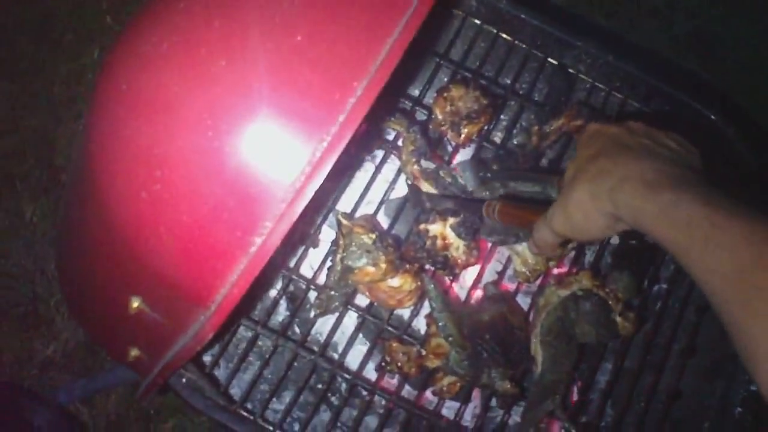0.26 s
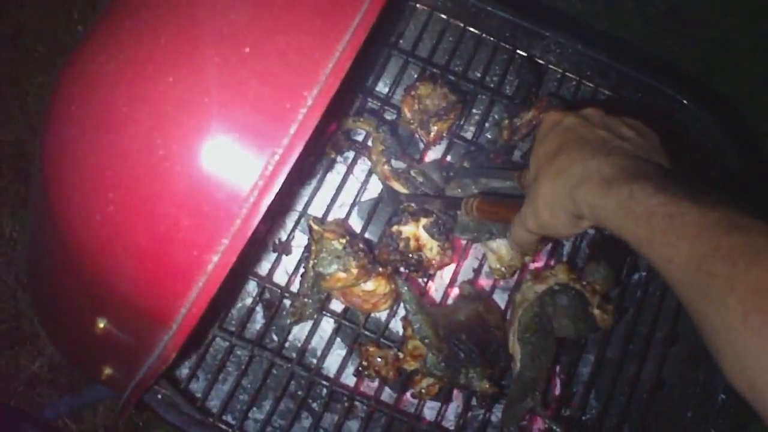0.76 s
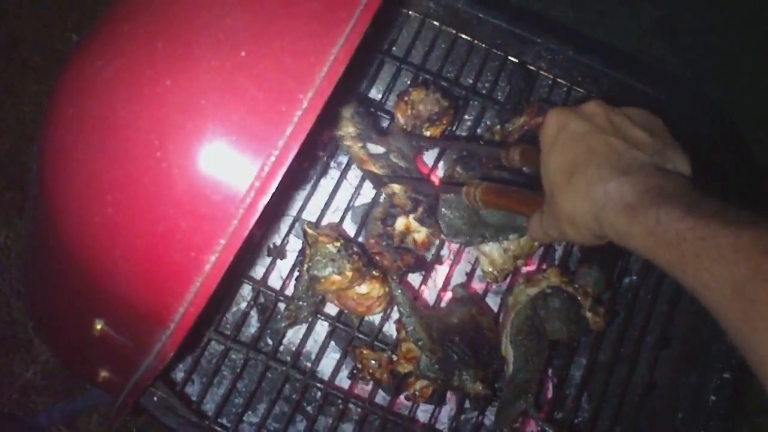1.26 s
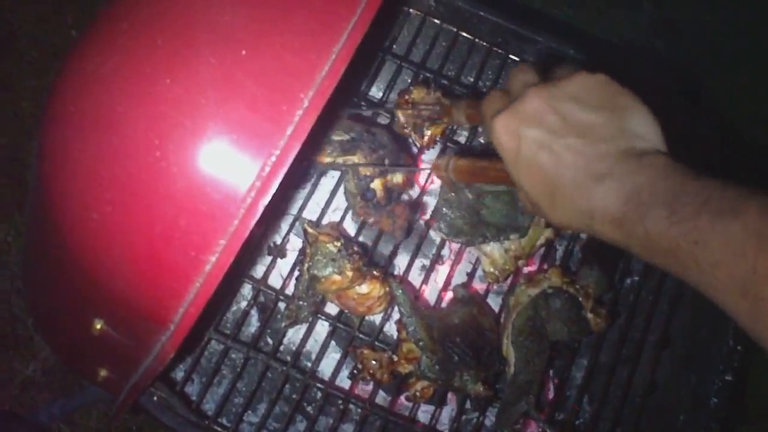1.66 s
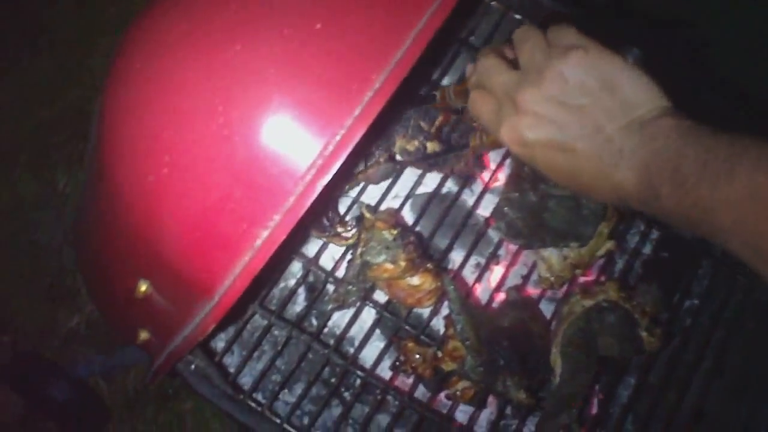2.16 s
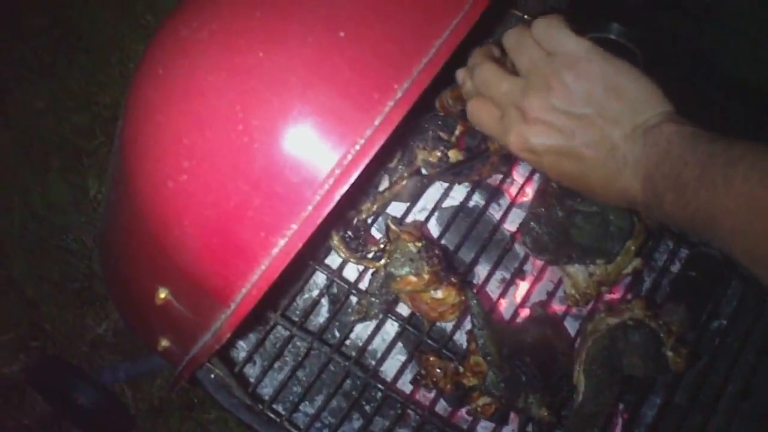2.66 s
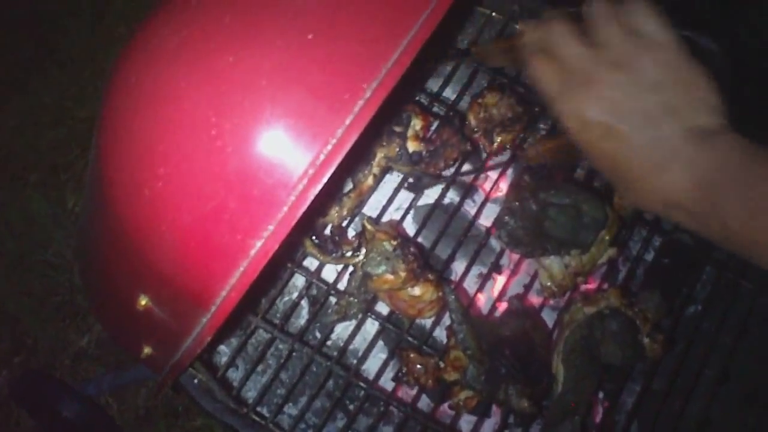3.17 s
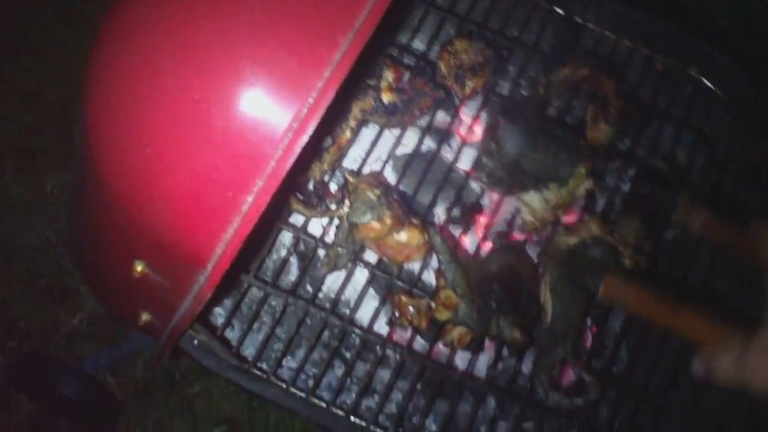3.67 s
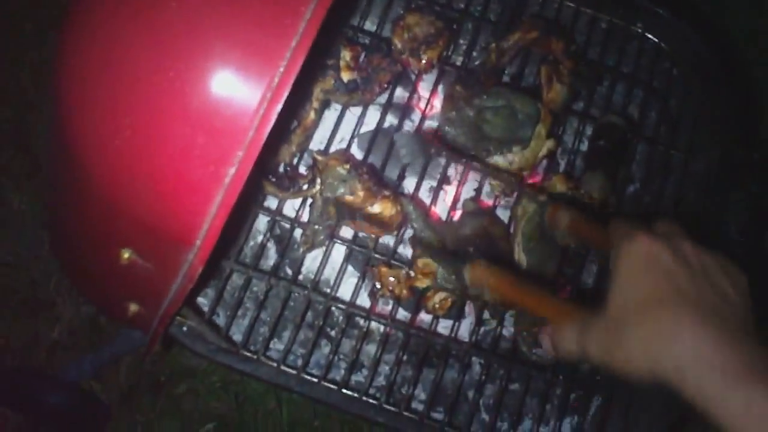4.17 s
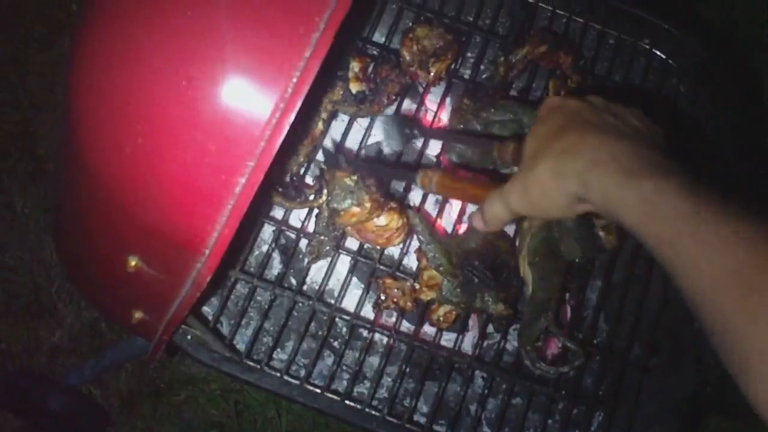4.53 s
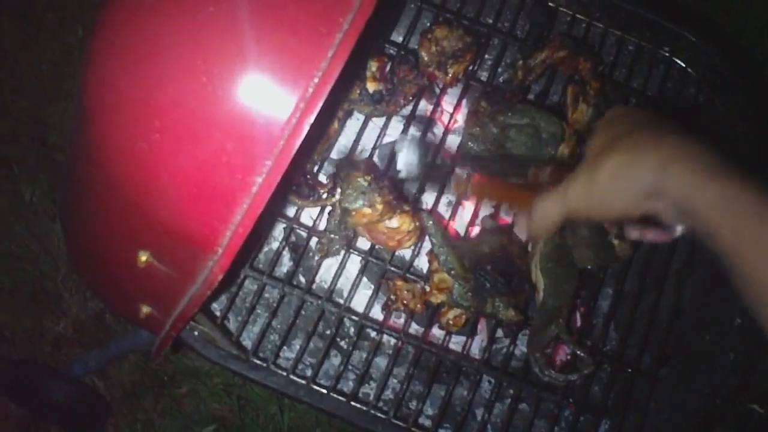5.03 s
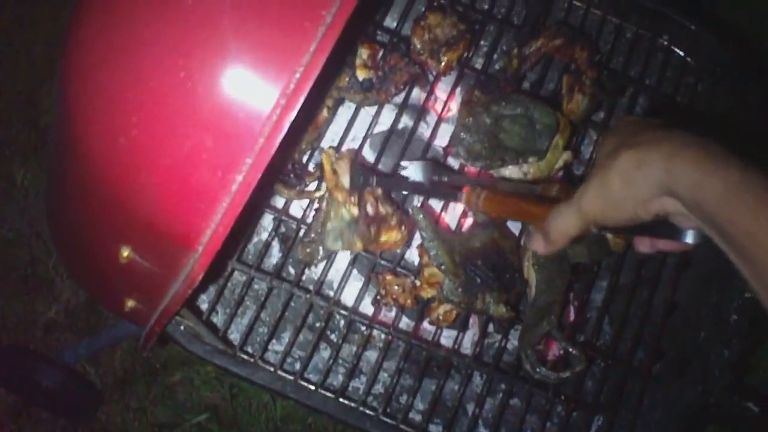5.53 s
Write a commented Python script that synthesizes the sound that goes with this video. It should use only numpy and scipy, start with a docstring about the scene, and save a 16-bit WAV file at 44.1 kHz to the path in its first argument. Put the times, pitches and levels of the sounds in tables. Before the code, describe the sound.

Fat hisses and spits over crackling coals outdoors, with a few light tong knocks, a steady fan hum and faint cricket chirps.

```python
"""Meat sizzles on a charcoal grill in a yard at night while it is turned with tongs.
Tiny steam bubbles burst in the fat, the coals crackle and the tongs knock briefly.
Spitting fat and tongs touching the grate make sharp pops and clicks.
Further off a fan motor hums and rushes, and a cricket chirps with its wings.
One narrow-band microphone hears it all."""
import sys
import numpy as np
from scipy import signal
from scipy.fft import rfft, irfft, next_fast_len
from scipy.io import wavfile

SR = 44100
rng = np.random.default_rng(int(sys.argv[2]) if len(sys.argv) > 2 else 0)


def unload_audio(sound):
    """Save the sound as a 16-bit wav file, at the path given as the first command line argument."""
    columns = np.transpose(np.atleast_2d(sound))
    # keep every value between -1 and 1, then stretch to whole-number steps
    steps = np.round(np.clip(columns, -1, 1) * 32767)
    wavfile.write(sys.argv[1], SR, steps.astype(np.int16))


N = 255780
TIME_S = np.arange(N) / SR

# air through the fan: freq_hz, density_db
FAN_AIR_SPECTRUM = [(25, -25.5), (60, -12), (130, -8.5), (280, -6), (450, -3.5), (680, 0.5), (1020, 2.5),
                    (1500, -1), (2100, -3), (2600, -8.5), (3100, -11), (3650, -13), (7000, -15.5),
                    (7700, -66)]
# steady motor tones: shaft_multiple, relative_db
MOTOR_HARMONICS = [(2, -19.5), (4, -16.5), (5, -21.5), (9, -20), (11, -14), (13, -19.5), (15, -11),
                   (18, -13), (19, -11), (20, -12), (21, -9), (24, -15.5), (27, -27), (28, -13.5),
                   (29, -13.5), (32, -11.5), (37, -16.5)]
# upper swelling fan tone: time_s, level_db
WHINE_LEVELS = [(0, -48), (.3, -55), (.45, -51), (2.1, -50), (3.2, -51.5), (3.6, -49.5), (3.92, -50.5),
                (4.05, -55.5), (4.52, -54.5), (4.62, -51.5), (4.95, -53.5), (5.35, -49.5), (5.8, -51)]
# lower swelling fan tone: time_s, level_db
DRONE_LEVELS = [(0, -59), (.45, -62), (.95, -56), (1.95, -59.5), (2.6, -57.5), (2.92, -54.5), (3.22, -58.5),
                (3.7, -56.5), (4.35, -55.5), (5.1, -54), (5.8, -58.5)]
# crackle of the coals: freq_hz, density_db
COAL_SPECTRUM = [(300, -23), (1000, -1.5), (1500, 1), (2200, 7), (3100, -6.5), (3800, -12), (5000, -22.5),
                 (8000, -57)]
# knocks of the tongs: start_s, strike_db
TONG_KNOCKS = [(1.6331, -28), (1.6912, -29), (2.8905, -21), (2.8980, -28), (2.8998, -27), (2.9028, -26),
               (2.9080, -30), (3.0326, -30)]
# resonances of the tongs: freq_hz, gain_db, t60_s
TONG_MODES = [(235, -27, 0.04), (370, -27, 0.035), (570, -22, 0.035), (680, -17, 0.03), (855, -11, 0.014),
              (1330, -9, 0.0093)]
# sharp pops and clicks from spitting fat and tongs touching the grate, levels as rms over 4 ms:
# start_s, crack_db, body_db, pitch_hz, width_octaves
GRILL_POPS = [(0.0568, -34, -36, 1900, .6), (0.1235, -39, -44, 3100, .8), (0.1966, -47, -43, 2700, 1),
              (0.5271, -39, -42, 2000, 1), (0.6015, -39, -47, 3000, 1), (0.6478, -41, -47, 2800, 1),
              (0.7039, -40, -45, 2900, .7), (0.8106, -38, -31, 2500, 1.15), (1.4332, -39, -44, 1400, .8),
              (1.4462, -40, -44, 3000, 1), (1.4991, -38, -39, 2500, 1.2), (1.5741, -35, -39, 3000, 1),
              (1.5985, -26.5, -31.5, 2800, .6), (1.6052, -38, -41, 2700, 1),
              (1.6204, -32, -33.5, 3100, .45), (1.6326, -33.5, -30.5, 2900, .65),
              (1.6906, -33.5, -35, 2400, .9), (1.7786, -43, -44, 2600, 1), (1.8548, -40, -47, 2600, 1),
              (1.9482, -40, -44, 2700, 1), (1.9663, -39, -42, 2500, .7), (2.1813, -40, -44, 2400, .7),
              (2.2414, -30.5, -41, 3300, .7), (2.2602, -36, -47, 3800, .7), (2.3060, -39, -44, 1900, .7),
              (2.3308, -32, -39, 3200, .9), (2.4967, -35, -38.5, 3000, .9), (2.5305, -38, -46, 2800, 1),
              (2.5395, -37, -44, 2800, .5), (2.5783, -44, -42, 2600, 1.2), (2.6189, -46, -45, 3600, .7),
              (2.9076, -33, -35, 2700, 1.3), (2.9995, -41.5, -43, 2900, .8),
              (3.0324, -37.5, -37.5, 2700, 1.5), (3.1024, -36, -41, 3300, .8), (3.1107, -41, -41, 2900, 1),
              (3.2407, -32, -34, 2800, .9), (3.4574, -33.5, -37.5, 1900, .8), (3.5188, -39, -47, 2600, 1),
              (3.7330, -39, -44, 1700, 1), (3.9804, -45, -44, 1800, .5), (4.0345, -42, -42, 1800, .7),
              (4.0451, -47, -45, 1900, .6), (4.4475, -42, -40.5, 1900, .7), (4.6365, -42, -42.5, 2400, .9),
              (4.7049, -50, -43, 1400, .8), (4.7391, -47, -45, 2600, .9), (4.8530, -40, -50, 3000, .8),
              (4.8982, -38, -47, 3100, .6), (4.9159, -38, -50, 3000, .6), (4.9359, -33, -42, 2700, 1),
              (4.9697, -31, -37, 4400, .5), (4.9928, -41, -46, 2900, .8), (5.2805, -47, -43, 1500, .8),
              (5.5102, -39.5, -47, 2800, 1), (5.5682, -40, -47, 2800, 1), (5.7700, -45, -46, 2000, 1)]
# crack of a pop: freq_hz, density_db
CRACK_SPECTRUM = [(1000, -26.5), (3700, -18), (4400, -5), (5000, -4), (5500, 6), (6200, 5.5), (6650, 8),
                  (7200, -1), (7700, -19), (8300, -42)]
# body of a pop, around its pitch: offset_widths, density_db
BODY_SHAPE = [(-5, -30), (-2.4, -13), (-1.2, -4.5), (-.4, -1.5), (0, 1), (.3, -1.5), (.6, -8), (1.1, -15),
              (2, -40)]
# thud under a pop: freq_hz, density_db
THUD_SPECTRUM = [(60, -26), (200, -10), (500, 0), (900, 0), (1400, -9), (2500, -25), (5000, -50)]
# frying fat: freq_hz, density_db
FAT_SPECTRUM = [(300, -20.5), (1000, -14), (2100, -2), (2650, -6), (3150, -0.5), (3620, -10), (4400, -4.5),
                (5050, -4.5), (5400, 2.5), (5750, 5), (6300, 1.5), (6700, 3.5), (7200, -3), (7700, -58.5)]
# slow course of the frying, easing while the meat is left alone: time_s, level_db
FRYING_LEVELS = [(0.0, -44), (1.05, -45), (1.44, -42), (1.82, -45), (2.35, -43), (2.9, -47), (3.45, -44.5),
                 (3.8, -47.5), (4.6, -48.5), (5.05, -49), (5.5, -44.5), (5.8, -47)]
# juice runs onto hot metal: peak_s, rise_db
JUICE_FLARES = [(0.2, 4.5), (0.725, 3.5), (1.149, 2.5), (1.429, 2), (1.59, 2.5), (3.09, 6.5), (5.02, 0.5),
                (5.24, 3)]


def from_db(db):
    """Decibels to gain."""
    return 10 ** (np.asarray(db) / 20)


def unit_rms(x):
    """Scale to rms 1."""
    return x / np.sqrt(np.mean(x ** 2) + 1e-20)


def curve(rows):
    """Breakpoints interpolated to every sample."""
    return np.interp(TIME_S, *np.transpose(rows))


def drift(rate_hz):
    """Slow random wander, rms 1."""
    hop, settle = 40, 2000
    pole = np.exp(-2 * np.pi * rate_hz * hop / SR)
    noise = rng.standard_normal(N // hop + settle + 2)
    slow = signal.lfilter([1], [1, -2 * pole, pole * pole], noise)[settle:]
    return np.interp(np.arange(N) / hop, np.arange(len(slow)), unit_rms(slow))


def coloured(x, spectrum):
    """Minimum-phase filter following rows of freq_hz, gain_db."""
    length = x.shape[-1]
    size = next_fast_len(length + SR // 10)
    freq_hz, gain_db = np.transpose(spectrum)
    grid_hz = np.maximum(np.arange(size // 2 + 1) * SR / size, 1)
    gain = from_db(np.interp(np.log(grid_hz), np.log(freq_hz), gain_db))
    cepstrum = irfft(np.log(gain), size)
    cepstrum[1:size // 2] *= 2
    cepstrum[size // 2 + 1:] = 0
    return irfft(rfft(x, size) * np.exp(rfft(cepstrum)), size)[..., :length]


def ring(clicks, freq_hz, t60_s):
    """Damped resonance: a unit click starts a sine of height 1."""
    radius = from_db(-60 / (t60_s * SR))
    step_rad = 2 * np.pi * freq_hz / SR
    feedback = [1, -2 * radius * np.cos(step_rad), radius * radius]
    return signal.lfilter([0, np.sin(step_rad)], feedback, clicks + 1e-18)


def random_clicks(rate_per_s, spread_db, cap_spreads):
    """Randomly timed clicks; levels in dB follow a capped exponential distribution."""
    heights = from_db(spread_db * np.minimum(rng.exponential(1, N), cap_spreads))
    return heights * (rng.random(N) < rate_per_s / SR)


def puffs(clicks, t60_s, bowl_db, bowl_t60_s):
    """Each click releases a puff of steam that scatters briefly in the grill bowl."""
    energy = clicks ** 2 + 1e-18
    direct = signal.lfilter([1], [1, -from_db(-120 / (t60_s * SR))], energy)
    scatter = signal.lfilter([1], [1, -from_db(-120 / (bowl_t60_s * SR))], energy)
    return np.sqrt(direct + from_db(bowl_db) ** 2 * scatter) * rng.standard_normal(N)


def fan(shaft_hz, wander_hz, hum_db, waver_db, rush_db):
    """Shaft harmonics, each wavering on its way across the yard, over a steady rush of air."""
    turns = np.cumsum(shaft_hz + wander_hz * drift(rate_hz=1.69)) / SR
    tones = [(multiple, hum_db + relative_db) for multiple, relative_db in MOTOR_HARMONICS]
    tones += [(16, curve(WHINE_LEVELS)), (14, curve(DRONE_LEVELS))]
    hum = np.zeros(N)
    for multiple, level_db in tones:
        amplitude = np.sqrt(2) * from_db(level_db + waver_db * drift(rate_hz=4.4))
        hum += amplitude * np.sin(2 * np.pi * (multiple * turns + rng.random()))
    rush = unit_rms(coloured(rng.standard_normal(N), FAN_AIR_SPECTRUM))
    return hum + from_db(rush_db) * rush


def cricket(pitch_hz, wander_hz, first_s, period_s, length_s, strokes_per_s):
    """Evenly paced, slowly fading chirps: a few wing strokes each on one nearly pure note."""
    start_db, fade_db_per_s, spread_db = -49, 0.65, 0.5
    envelope = np.zeros(N)
    for centre_s in np.arange(first_s, TIME_S[-1], period_s):
        level_db = start_db - fade_db_per_s * centre_s - spread_db * rng.standard_normal()
        swell = np.exp(-np.abs(2 * (TIME_S - centre_s) / length_s) ** 4)
        strokes = np.abs(np.cos(np.pi * (strokes_per_s * TIME_S + rng.random())))
        envelope += 2 * from_db(level_db) * swell * strokes
    cycles = np.cumsum(pitch_hz + wander_hz * drift(rate_hz=30)) / SR
    return envelope * np.sin(2 * np.pi * cycles)


def coals(level_db):
    """Low, even crackle, independent of the frying."""
    clicks = random_clicks(rate_per_s=60, spread_db=3.5, cap_spreads=2.5)
    crackle = puffs(clicks, t60_s=0.014, bowl_db=-22.5, bowl_t60_s=0.019)
    return from_db(level_db) * unit_rms(coloured(crackle, COAL_SPECTRUM))


def tongs(low_cut_hz):
    """Soft, quickly damped knocks; thin steel radiates no bass."""
    start_s, strike_db = np.transpose(TONG_KNOCKS)
    strikes = np.zeros(N)
    strikes[np.round(start_s * SR).astype(int)] = from_db(strike_db)
    high_pass = signal.butter(2, low_cut_hz, "high", fs=SR, output="sos")
    strikes = signal.sosfilt(high_pass, strikes + 1e-18)
    return sum(from_db(gain_db) * ring(strikes, hz, t60_s) for hz, gain_db, t60_s in TONG_MODES)


def pop(spectrum, bowl_db, bowl_t60_s):
    """A snap, a puff of noise and a faint tail from the bowl; energy equals 4 ms at rms 1."""
    snap_share, attack_s, puff_t60_s = 0.35, 0.0004, 0.006
    age_s = TIME_S[:SR // 20]
    attack = 1 - np.exp(-age_s / attack_s)
    decay = from_db(-60 * age_s / puff_t60_s) + from_db(bowl_db - 60 * age_s / bowl_t60_s)
    puff = rng.standard_normal(len(age_s)) * decay * attack
    puff *= np.sqrt((1 - snap_share) / np.sum(puff ** 2))
    snap = np.sqrt(snap_share) * signal.unit_impulse(len(age_s))
    burst = coloured(snap + puff, spectrum)
    return burst / np.sqrt(np.sum(burst ** 2) / (0.004 * SR))


def grill_pops(body_top_hz, body_lag_s, thud_relative_db):
    """Fat spits or tongs touch the grate: a bright crack, then a lower body and a dull thud."""
    track = np.zeros(N + SR)
    low_pass = signal.butter(8, body_top_hz, fs=SR, output="sos")
    for start_s, crack_db, body_db, pitch_hz, width_octaves in GRILL_POPS:
        crack = from_db(crack_db) * pop(CRACK_SPECTRUM, bowl_db=-25, bowl_t60_s=0.08)
        body_spectrum = [(pitch_hz * 2 ** (offset * width_octaves), db) for offset, db in BODY_SHAPE]
        body = from_db(body_db) * pop(body_spectrum, bowl_db=-24, bowl_t60_s=0.085)
        body = signal.sosfilt(low_pass, body)
        thud = from_db(body_db + thud_relative_db) * pop(THUD_SPECTRUM, bowl_db=-26, bowl_t60_s=0.03)
        for onset_s, sound in ((start_s, crack), (start_s + body_lag_s, body + thud)):
            onset = int(onset_s * SR)
            track[onset:onset + len(sound)] += sound
    return track[:N]


def frying_db(attack_s, release_s):
    """Sizzle level: a slow course plus brief flares as juice meets hot metal."""
    level_db = curve(FRYING_LEVELS)
    for peak_s, rise_db in JUICE_FLARES:
        width_s = np.where(TIME_S < peak_s, attack_s, release_s)
        level_db += rise_db * np.exp(-((TIME_S - peak_s) / width_s) ** 2)
    return level_db


def sizzle(haze_db, crackle_db):
    """A haze of tiny bubbles plus sparser crackle; harder frying bursts louder and more often."""
    level = from_db(frying_db(attack_s=0.026, release_s=0.072))
    vigour = unit_rms(level)
    bubbles = random_clicks(rate_per_s=5000 * vigour, spread_db=-3.5, cap_spreads=3.6)
    haze = puffs(bubbles, t60_s=0.012, bowl_db=-12, bowl_t60_s=0.072)
    clustering = from_db(2 * drift(rate_hz=13))
    ticks = random_clicks(rate_per_s=260 * vigour * clustering, spread_db=4, cap_spreads=2.6)
    crackle = puffs(ticks, t60_s=0.0098, bowl_db=-18.5, bowl_t60_s=0.045)
    fat = from_db(haze_db) * unit_rms(coloured(haze, FAT_SPECTRUM))
    fat += from_db(crackle_db) * unit_rms(coloured(crackle, FAT_SPECTRUM))
    return fat * level / np.sqrt(vigour)  # the burst rate already contributes sqrt(vigour)


def scene():
    """Grill and yard at one microphone, alike in both channels."""
    grill = sizzle(haze_db=-0.5, crackle_db=-5.5)
    grill += grill_pops(body_top_hz=6500, body_lag_s=0.0002, thud_relative_db=-18)
    grill += coals(level_db=-61.5)
    grill += tongs(low_cut_hz=362)
    yard = fan(shaft_hz=59.1, wander_hz=0.025, hum_db=-51.5, waver_db=0.7, rush_db=-45.5)
    yard += cricket(pitch_hz=6757, wander_hz=24, first_s=0.095, period_s=0.387,
                    length_s=0.13, strokes_per_s=27)
    return np.tile(grill + yard, (2, 1))


def record(dry):
    """Narrow band: a steep low-pass cuts the top."""
    cutoff_hz = 8200
    return signal.sosfilt(signal.ellip(10, 0.1, 75, cutoff_hz, fs=SR, output="sos"), dry)


dry = scene()
out = record(dry)
unload_audio(out)
```